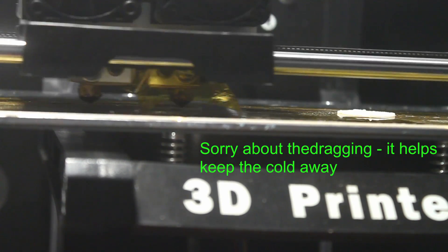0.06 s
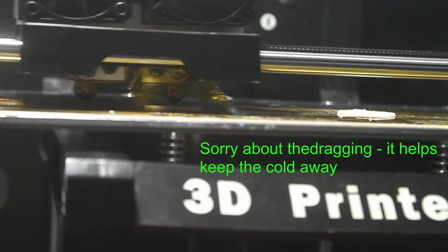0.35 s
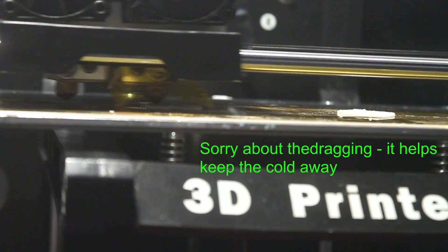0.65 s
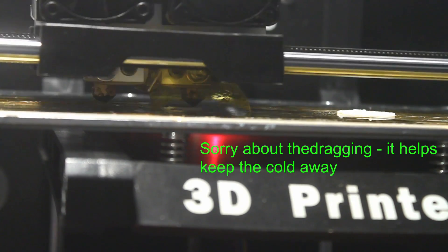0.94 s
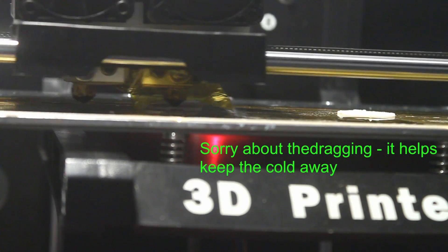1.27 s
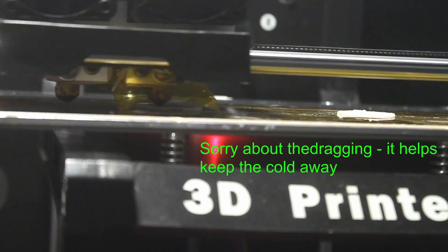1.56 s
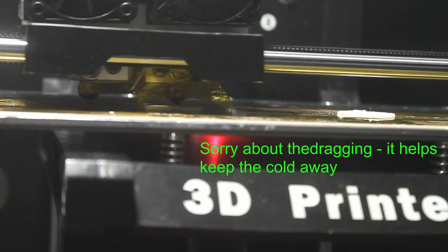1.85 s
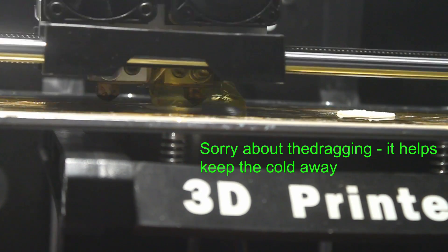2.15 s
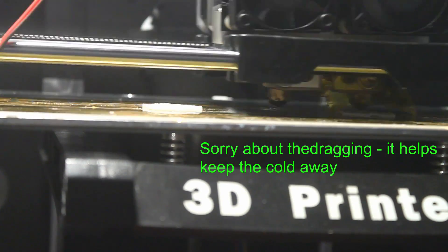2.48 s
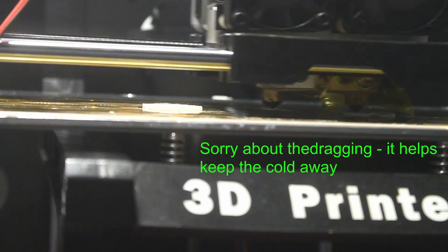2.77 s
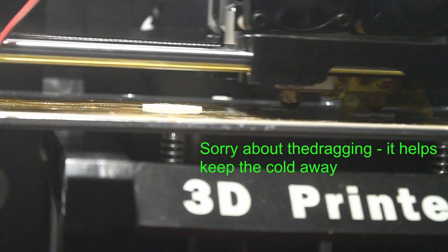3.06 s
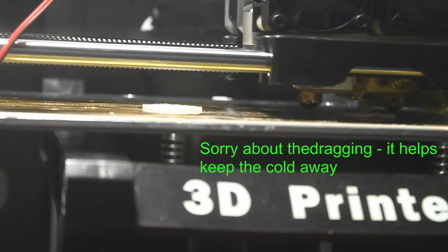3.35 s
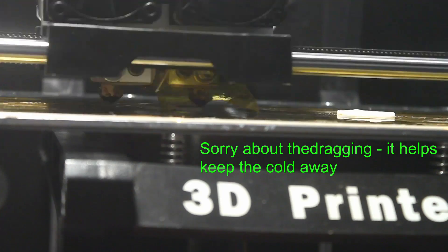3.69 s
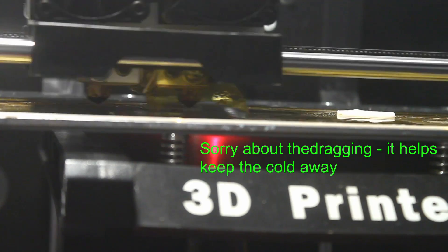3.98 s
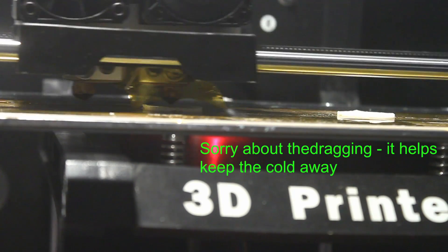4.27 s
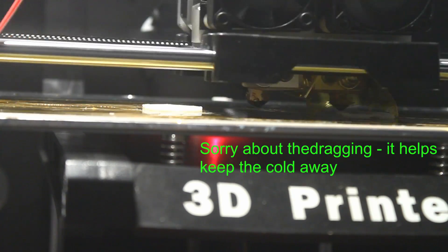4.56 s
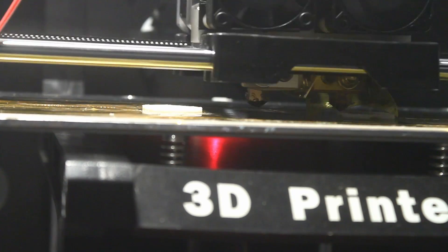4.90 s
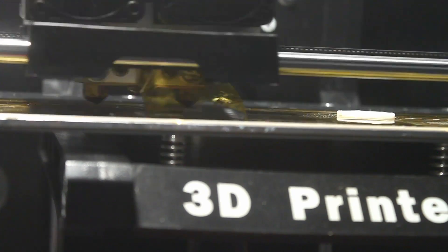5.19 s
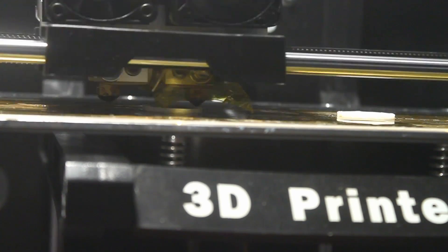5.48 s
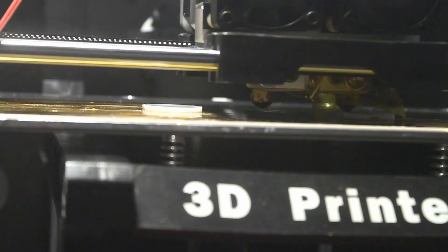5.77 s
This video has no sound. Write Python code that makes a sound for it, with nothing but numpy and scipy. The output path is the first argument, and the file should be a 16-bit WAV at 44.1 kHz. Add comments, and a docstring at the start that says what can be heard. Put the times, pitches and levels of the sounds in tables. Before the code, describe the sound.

A desktop 3D printer chirps and buzzes in bright, high-pitched bursts, with rattles, ticks and knocks over whining, hissing fans.

```python
"""The stepper motors of a desktop 3D printer, close up and very bright, singing at a pitch that follows
the speed of the head: fast zigzags fill a layer, then short darts trace outlines.
Each move rattles the rails and each stop jolts the chassis. The carriage knocks, the case thuds,
the nozzle ticks and squeaks on the print, and the filament zips back and forth at the corners.
Behind it two fans whine and hiss, one sagging while the bed heater draws current."""
import sys
import numpy as np
from scipy import signal
from scipy.fft import rfft, irfft
from scipy.io import wavfile

SR = 44100
rng = np.random.default_rng(int(sys.argv[2]) if len(sys.argv) > 2 else 0)


def transcribe(u):
    """Save the signal u as a 16-bit wav file named by the first command-line argument.

    u: samples, shape (n,) or (channels, n), limited to [-1, 1]; the rate is SR.
    q: integer samples, one column per channel.
    """
    v = np.clip(np.atleast_2d(u).T, -1, 1)
    q = np.round(v * 32767).astype(np.int16)
    wavfile.write(sys.argv[1], SR, q)


N = 266364
TIME = np.arange(N) / SR
BINS = np.fft.rfftfreq(N, 1 / SR)
BAND_LIMIT_HZ = 15830


def amp(db):
    """Decibels to gain."""
    return 10 ** (np.asarray(db) / 20)


def unit(x):
    """Scales to rms 1."""
    return x / np.sqrt(np.mean(x ** 2) + 1e-20)


def add(mix, s, sound):
    """Drops a sound into the mix at time s."""
    part = mix[max(round(s * SR), 0):][:len(sound)]
    part += sound[:len(part)]


def eq_db(eq):
    """Joins EQ points on a log-frequency axis."""
    hz, db = np.transpose(eq)
    return np.interp(np.log(BINS + 1), np.log(hz), db)


def drift(hz):
    """Random modulator of rms 1, rolling off above hz."""
    return unit(irfft(rfft(rng.standard_normal(N)) / (1 + (BINS / hz) ** 4), N))


def ring(x, eq):
    """Minimum-phase EQ: resonances ring after what excites them."""
    log_gain = np.log(amp(eq_db(eq)))
    mirrored = np.r_[log_gain, log_gain[-2:0:-1]]
    response = np.exp(np.conj(signal.hilbert(mirrored)))[:len(BINS)]
    return irfft(rfft(x) * response, N)


def enclosure(x, wet_db, t60):
    """Quick, dense reflections between the printer's walls."""
    t = np.arange(SR // 5) / SR
    taps = rng.standard_normal(len(t)) * np.exp(-np.log(1000) * t / t60) * (t > .001)
    return x + amp(wet_db) * signal.fftconvolve(x, taps / np.linalg.norm(taps))[:N]


# case resonances: f/Hz, width/Hz, gain/dB
CASE_MODES = [(1194, 160, 8), (1475, 365, 11.5), (2137, 340, 11.5), (2552, 353, 11), (3594, 173, 7.5),
              (4437, 250, 8.5), (4930, 410, 5.5), (5760, 570, 8), (6653, 690, 9.5), (8230, 130, 11),
              (9000, 350, 5.5), (11000, 2500, -1.5), (13500, 270, -1), (13850, 430, 4.5), (15540, 590, 3)]
def case_noise(eq, panels=()):
    """EQ'd noise of rms 1, coloured by the case and any ringing panels."""
    peaks_db = sum(db / (1 + (2 * (BINS - hz) / width) ** 2) ** 1.41
                   for hz, width, db in [*CASE_MODES, *panels])
    return unit(irfft(rfft(rng.standard_normal(N)) * amp(eq_db(eq) + peaks_db), N))


# airflow EQ: f/Hz, gain/dB
HISS_EQ = [(130, -58), (270, -32.5), (500, -25), (750, -27.5), (1000, -21.5), (1800, -21.5), (3200, -9),
           (4000, -8), (5500, -5), (7500, 4), (10000, -0.5), (16000, 2)]
# airflow fader ride, before trim: t/s, level/dB
HISS_RIDE = [(0.0, -37), (1.6, -36.5), (1.8, -37), (3.67, -36), (3.85, -37.5), (6.04, -36.5)]
def fan_hiss(trim_db=4, flicker_db=1.76):
    """A bed of air, blown through the case by the fans."""
    ride_db = np.interp(TIME, *np.transpose(HISS_RIDE))
    return amp(ride_db + trim_db + flicker_db * drift(hz=190)) * case_noise(HISS_EQ)


# blade rate of the cooling fan: t/s, f/Hz
BLADE_RATE = [(0, 1467), (.72, 1466), (.9, 1439), (2.03, 1438), (2.15, 1459), (2.35, 1467), (3.7, 1466),
              (3.9, 1439), (5.03, 1438), (5.15, 1459), (5.35, 1467)]
# partials of each fan: harmonic, heater-off level/dB, heater-on level/dB
COOLING_PARTIALS = [(1, -66, -69), (5, -52.5, -51), (6, -52, -57), (7, -52.3, -53.3), (8, -55, -60),
                    (9, -61, -55), (10, -48.3, -59)]
NOZZLE_PARTIALS = [(1, -66, -67), (9, -47.8, -47.8)]
def fan_whine(nozzle_hz=1401, flutter_db=2):
    """Two wavering blade tones; the heater's load slows the cooling fan and rebalances the partials."""
    cooling_hz = np.interp(TIME, *np.transpose(BLADE_RATE))
    sag = (cooling_hz.max() - cooling_hz) / np.ptp(cooling_hz)
    whine = np.zeros(N)
    for hz, partials, waver in (cooling_hz, COOLING_PARTIALS, .0004), (nozzle_hz, NOZZLE_PARTIALS, .001):
        phase = 2 * np.pi * np.cumsum(hz * (1 + waver * drift(hz=7.5))) / SR
        for harmonic, off_db, on_db in partials:
            db = off_db + sag * (on_db - off_db) + flutter_db * drift(hz=36)
            whine += np.sqrt(2) * amp(db) * np.sin(harmonic * phase)
    return whine


# chassis body: f/Hz, gain/dB
CHASSIS_EQ = [(100, -28), (170, -10), (210, -5.5), (250, -9), (340, 1.5), (520, -4.5), (800, -10.5),
              (3000, -42)]
def chassis_hum(fill_jolts, dart_jolts, left_db=-29, right_db=-32, dart_db=-4):
    """Stops jolt the chassis; lopsided zigzag jolts merge into a hum that rises as strokes shorten."""
    zigzag = amp(left_db) * (fill_jolts > 0) - amp(right_db) * (fill_jolts < 0)
    bumps = amp(dart_db) * enclosure(dart_jolts, wet_db=5.5, t60=.11)
    return ring(zigzag + bumps, CHASSIS_EQ)


# rattle EQ: f/Hz, gain/dB
RAIL_EQ = [(130, -53), (260, -44), (500, -16.5), (1000, -28.5), (2000, -9), (4000, -3.5), (5500, 4),
           (7500, 2), (10000, 2.5), (16000, -15)]
def rail_rattle(effort, trim_db, decay_ms, grit_db):
    """Bearings and belt rattle while the head moves, and settle just after."""
    pole = np.exp(-1000 / (decay_ms * SR))
    shake = signal.lfilter([1 - pole], [1, -pole], effort)
    return amp(trim_db + grit_db * drift(hz=96)) * shake * case_noise(RAIL_EQ)


# clear squeaks: t/s, length/ms, start f/Hz, end f/Hz, level/dB
SQUEAK_CUES = [(.912, 18, 4610, 4220, -43), (.94, 22, 4480, 3980, -40), (1.525, 21, 4450, 4000, -43),
               (2.822, 30, 4350, 4060, -43), (2.851, 117, 4060, 4340, -42), (3.078, 20, 4270, 4140, -38.5),
               (4.305, 25, 4420, 3840, -46), (4.99, 36, 4350, 4080, -49)]
def head_squeaks(flutter_db=2, clear_rad=.28, raspy_rad=1.1, drag_s=(2.6, 5.1), drop_hz=300):
    """The dragging head sticks and slips: clear glides, plus small raspy ones where it rubs hardest."""
    squeaks = np.zeros(N)
    slips = drift(hz=210)
    glides = [(*cue, clear_rad) for cue in SQUEAK_CUES]
    for when, length, pitch, level in rng.random((26, 4)):
        start = drag_s[0] + when * (drag_s[1] - drag_s[0])
        ms, hz, db = 8 + 16 * length, 4100 + 600 * pitch, -47 + 8 * level
        glides.append((start, ms, hz + drop_hz / 2, hz - drop_hz / 2, db, raspy_rad))
    for start, ms, first_hz, last_hz, db, rasp in glides:
        hz = np.linspace(first_hz, last_hz, int(ms * SR / 1000))
        phase = 2 * np.pi * np.cumsum(hz) / SR + rasp * slips[round(start * SR):][:len(hz)]
        add(squeaks, start, amp(db) * np.sqrt(2 * np.hanning(len(hz))) * np.sin(phase))
    return squeaks * amp(flutter_db * drift(hz=93))


# passes round one sharp corner of the outline: t/s, route in, route out
CORNER_CUES = [(3.4354, "fill", "bounce"), (3.7841, "leap", "bounce"), (4.1092, "curve", "feed"),
               (4.4691, "glide", "feed"), (4.8014, "curve", "feed"), (5.1573, "leap", "bounce"),
               (5.4826, "curve", "feed"), (5.8423, "glide", "feed")]
def at_corners(figure):
    """Repeats a figure, timed from each corner, keeping the cues on that pass's routes."""
    return [(s + offset, *cue)
            for s, route_in, route_out in CORNER_CUES
            for offset, *cue, routes in figure
            if {"all", route_in, route_out} & set(routes.split())]


def hits(cues, eq, trim_db, attack_ms, t60, panels=()):
    """Each hit briefly rings the dense modes of the case, at its cue level plus the trim."""
    t = np.arange(SR // 5) / SR
    strike = (1 - np.exp(-t * 1000 / attack_ms)) * np.exp(-np.log(1000) * t / t60)
    envelope = np.zeros(N)
    for s, db in cues:
        add(envelope, s, amp(db + trim_db) * strike / strike.max())
    return envelope * case_noise(eq, panels)


# bumps on the case: t/s, level/dB
THUD_CUES = [(3.517, -44.5), (3.539, -41.5), (3.586, -36.5), (3.612, -35.5), (3.876, -41), (3.931, -44),
             (3.962, -43.5), (4.054, -42.5), (4.123, -38.5), (4.163, -45.5)]
# thud EQ: f/Hz, gain/dB
THUD_EQ = [(60, -25), (250, -30), (550, -12), (830, -3.5), (1200, 2), (1700, -10), (3500, 1), (8000, 6)]
# panel resonances: f/Hz, width/Hz, gain/dB
PANEL_MODES = [(814, 140, 10.5), (1168, 150, 6.5), (3600, 430, 8)]
def case_thuds():
    """Dull bumps set the panels ringing."""
    return hits(THUD_CUES, THUD_EQ, trim_db=8, attack_ms=.27, t60=.081, panels=PANEL_MODES)


# stray knocks: t/s, level/dB
KNOCK_CUES = [(0.151, -36), (0.2765, -37), (1.0549, -34), (1.197, -37), (2.464, -32.5), (3.563, -31.5),
              (3.7007, -33), (3.7706, -36), (3.9912, -32.5), (4.122, -35.5)]
# corner knocks: offset/s, level/dB, routes
KNOCK_FIGURE = [(-.077, -33.5, "curve fill"), (-.054, -34.5, "leap glide"), (-.042, -34, "all"),
                (.039, -33.5, "feed"), (.041, -29, "bounce"), (.049, -32, "bounce"), (.149, -37, "all")]
# knock EQ: f/Hz, gain/dB
KNOCK_EQ = [(100, -20), (300, -22), (900, -10.5), (1800, -2), (2700, 8.5), (4500, 5), (8000, 12.5),
            (16000, -7.5)]
def carriage_knocks():
    """The carriage knocks as it turns corners, and here and there between."""
    cues = list(KNOCK_CUES) + at_corners(KNOCK_FIGURE)
    return hits(cues, KNOCK_EQ, trim_db=3.5, attack_ms=.22, t60=.041)


# filament moves: offset/s, level/dB, routes
ZIP_FIGURE = [(-.016, -30.5, "all"), (.046, -27, "feed")]
# zip EQ: f/Hz, gain/dB
ZIP_EQ = [(2000, -52), (6000, -76), (9500, 1), (11500, 5), (13500, 4), (16000, -17.5)]
def filament_zips():
    """Thin zips as filament is pulled back before each corner and fed on after some."""
    return hits(at_corners(ZIP_FIGURE), ZIP_EQ, trim_db=2, attack_ms=2.2, t60=.022)


# nozzle catches: t/s, level/dB
TICK_CUES = [(1.4324, -19), (1.4954, -30), (1.783, -27), (2.089, -22), (2.174, -29), (2.2347, -26),
             (2.2923, -29), (2.3623, -25), (2.616, -21.5), (2.6528, -24.5), (2.7262, -24), (2.7856, -23),
             (2.8196, -23.5), (2.8814, -23.5), (3.0539, -21.5)]
# tick EQ: f/Hz, gain/dB
TICK_EQ = [(300, -71), (2000, -9.5), (4000, 0), (7000, 8), (10000, 3), (12000, 16.5), (16000, -0.5)]
def nozzle_ticks():
    """Crisp ticks as the nozzle catches on the print."""
    return hits(TICK_CUES, TICK_EQ, trim_db=.5, attack_ms=.33, t60=.011)


# how the frame radiates the motor tone: f/Hz, gain/dB
FRAME_EQ = [(1000, -50.5), (2500, -19), (4000, -32.5), (5000, -5), (5900, -7.5), (6550, 8), (6950, -2),
            (7450, 3), (8250, 6), (9500, -10.5), (11400, 2.5), (13700, -0.5), (16000, -22)]
def stepper(moves, octave_db, shudder_rad, brake_db, attack_ms, ramp_hz_per_ms=2290):
    """Pitch follows each move as it speeds up, cruises and brakes. Returns sound, effort and jolts."""
    tone, effort, jolts = np.zeros((3, N))
    wobble = drift(hz=1220)
    for k, (start, ms, top_hz, db) in enumerate(moves):
        t_ms = np.arange(int(ms * SR / 1000)) * 1000 / SR
        hz = np.minimum(top_hz, ramp_hz_per_ms * np.minimum(t_ms, t_ms[::-1]))
        phase = 2 * np.pi * (np.cumsum(hz) / SR + rng.random())
        braking = np.clip((t_ms - ms + top_hz / ramp_hz_per_ms + 1) / 2, 0, 1)
        shudder = np.take(wobble, round(start * SR) + np.arange(len(hz)), mode="wrap")
        phase += shudder_rad * braking * shudder  # the braking belt roughens the tone
        octave = amp(octave_db) * np.sin(2 * phase) * (2 * hz < BAND_LIMIT_HZ)
        envelope = np.minimum(t_ms / attack_ms, 1) * amp(db + brake_db * braking)
        add(tone, start, envelope * np.sqrt(2) * (np.sin(phase) + octave))
        add(effort, start, amp(db) * hz / top_hz)
        add(jolts, start + ms / 1000, (-1) ** k * amp([db]))  # stops alternate left and right
    return ring(tone, FRAME_EQ), effort, jolts


# darts to and between patches: t/s, length/ms, cruise f/Hz, level/dB
DART_CUES = [(0.0107, 8.8, 6520, -30), (0.0729, 6.4, 6640, -27.5), (0.1582, 9.8, 9200, -27),
             (0.283, 9.4, 9400, -26.5), (0.3611, 7.6, 8900, -30), (0.4414, 8.7, 9200, -26.5),
             (0.7356, 7.7, 6860, -25.5), (1.1439, 11, 9000, -26), (1.3649, 4.1, 6800, -20),
             (1.4125, 7, 6400, -27), (1.4314, 8.8, 11600, -23), (1.45, 17, 9840, -25.5),
             (1.4703, 17, 9530, -22), (1.5337, 11, 6560, -32.5), (1.5825, 7.8, 6900, -28),
             (2.3883, 23, 9100, -27.5), (2.4089, 9.3, 8800, -28.5), (2.4235, 20, 9670, -24.5),
             (2.4419, 14.7, 10060, -24), (2.5553, 10, 6840, -25.5)]
# corner darts: offset/s, length/ms, cruise f/Hz, level/dB, routes
DART_FIGURE = [(-.169, 10.5, 6580, -31, "glide leap"), (-.143, 10.5, 6490, -32, "curve"),
               (-.12, 10, 6750, -31, "glide leap"), (-.104, 28, 12060, -32, "glide"),
               (-.104, 27, 16100, -29, "leap"), (-.094, 7.3, 6600, -29, "curve"),
               (-.079, 6, 6750, -22.5, "curve"), (-.065, 9, 9030, -26.5, "all"),
               (-.05, 9.5, 8910, -24.5, "all"), (-.041, 10, 12000, -27.5, "all"),
               (0, 9.4, 12000, -25, "all"), (.017, 11, 9030, -26.5, "all"), (.032, 9.5, 9030, -24.5, "all"),
               (.063, 9.6, 6640, -35, "feed"), (.108, 7, 6700, -32, "feed")]
def dart_moves(strokes, nudge_ms=7, nudge_hz=7800, nudge_db=-34, spread_db=3):
    """Single chirping moves, plus tiny nudges along curves whenever the head is not filling."""
    moves = list(DART_CUES) + at_corners(DART_FIGURE)
    for when, length, level in rng.random((150, 3)):
        s = when * N / SR
        filling = any(0 <= s - start < ms / 1000 for start, ms, _, _ in strokes)
        if not filling:
            db = nudge_db + spread_db * (2 * level - 1)
            moves.append((s, nudge_ms * (.75 + length / 2), nudge_hz, db))
    return moves


# zigzag patches: t/s, stroke count, first stroke/ms, last stroke/ms, edge curve (1 = straight)
FILL_PATCHES = [(.553, 4, 16.3, 16.3, 1), (.618, 12, 10.2, 8.3, 1), (.742, 4, 16.4, 16.4, 1),
                (.837, 14, 9.6, 12.8, 3), (.983, 7, 10.7, 8.3, 2), (1.059, 4, 9, 9, 1),
                (1.101, 3, 10, 10, 1), (1.16, 3, 11.5, 9.5, 1), (1.207, 7, 10, 8, 1),
                (1.27, 6, 10.3, 12.2, 1), (1.6027, 33, 16.85, 8.6, 3.27), (2.0982, 20, 16.3, 9.9, 2),
                (2.5754, 30, 16.9, 10.5, 3), (3.0555, 21, 16.44, 9.8, 2.06)]
def fill_strokes(cruise_hz=6875, drive_db=-24, spread_db=3.5, pause_ms=1.5):
    """Zigzag strokes follow the width of each patch, each driving the frame a little differently."""
    strokes = []
    for start, count, first_ms, last_ms, curve in FILL_PATCHES:
        for ms in first_ms + (last_ms - first_ms) * np.linspace(0, 1, count) ** curve:
            db = drive_db + spread_db * rng.uniform(-1.02, 1)
            strokes.append((start, ms - pause_ms, cruise_hz, db))
            start += ms / 1000
    return strokes


def scene():
    """Mono mix: motors up front, the mechanics around them, fans behind."""
    strokes = fill_strokes()
    fill, fill_effort, fill_jolts = stepper(
        strokes, octave_db=-15, shudder_rad=.35, brake_db=-4, attack_ms=4)
    darts, dart_effort, dart_jolts = stepper(
        dart_moves(strokes), octave_db=-10.5, shudder_rad=2.1, brake_db=2, attack_ms=.79)
    motors = enclosure(fill, wet_db=-20, t60=.08) + enclosure(darts, wet_db=-20, t60=.06)
    hum = chassis_hum(fill_jolts, dart_jolts)
    rattle = rail_rattle(fill_effort, trim_db=-17, decay_ms=6.7, grit_db=3.5)
    rattle += rail_rattle(dart_effort, trim_db=-9, decay_ms=6.9, grit_db=-2.5)
    clatter = carriage_knocks() + case_thuds() + nozzle_ticks() + filament_zips()
    return (motors + hum + rattle + clatter + fan_whine() + head_squeaks() + fan_hiss())[None]


def record(dry, low_cut_hz=205):
    """A microphone with almost no bass, then a steep high cut."""
    low_cut = signal.butter(N=4, Wn=low_cut_hz, btype="high", fs=SR, output="sos")
    high_cut = signal.firwin(767, BAND_LIMIT_HZ, window=("kaiser", 9), fs=SR)
    return signal.oaconvolve(signal.sosfilt(low_cut, dry), high_cut[None], "same")


dry = scene()
out = record(dry)
transcribe(out)
```